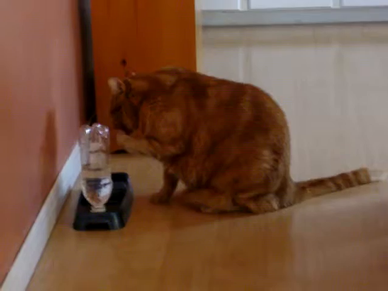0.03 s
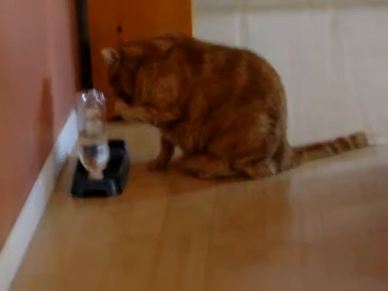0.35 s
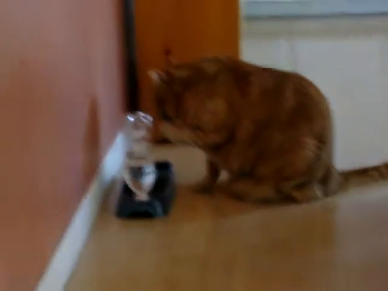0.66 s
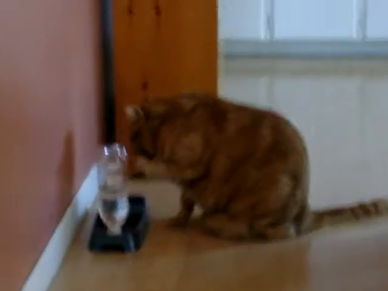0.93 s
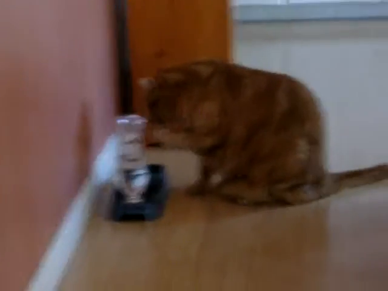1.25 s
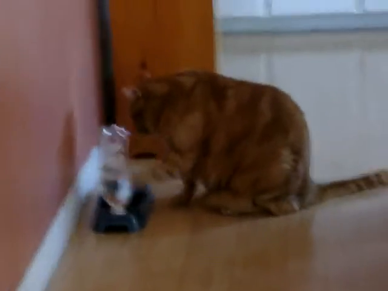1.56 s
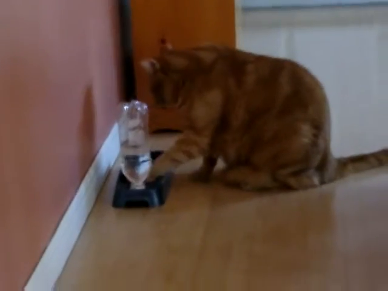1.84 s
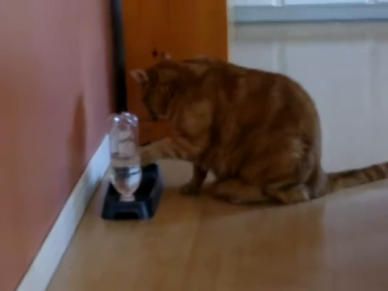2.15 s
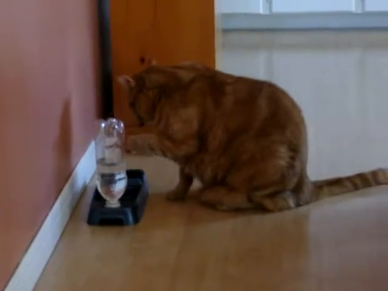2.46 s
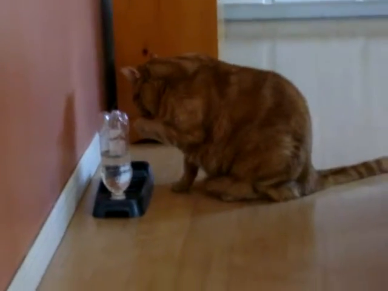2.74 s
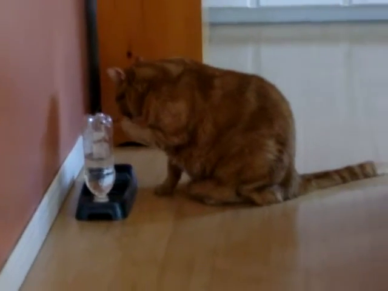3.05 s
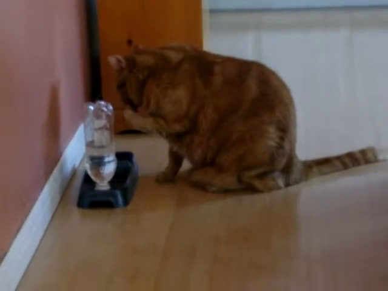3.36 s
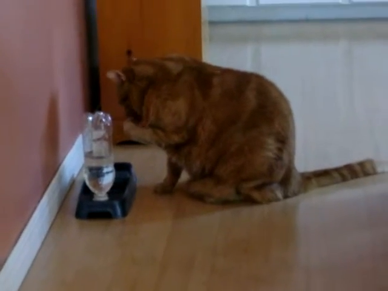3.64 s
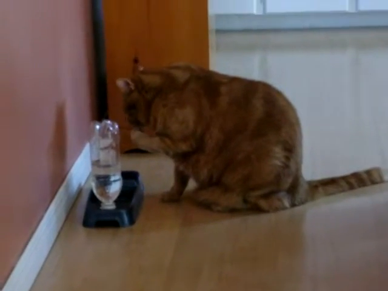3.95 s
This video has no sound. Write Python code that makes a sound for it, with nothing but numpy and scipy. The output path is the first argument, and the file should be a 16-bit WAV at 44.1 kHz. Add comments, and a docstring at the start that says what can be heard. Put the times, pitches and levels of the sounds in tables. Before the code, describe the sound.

Fingers handle a plastic camera case right at the microphone, rubbing softly at first, then knocking and thudding between 0.5 and 0.9 seconds. A small mechanism ticks sharply, loudest around 1.3 seconds, again near 2.0, 2.6 and 2.7, and more faintly at 3.3. A few soft bumps fall in between. A thin high electronic whine, low hum and hiss continue throughout in the quiet room.

```python
"""What seem to be fingers knock, bump and rub a camera's plastic case, right at the microphone.
As the grip shifts, hard taps ring the hollow shell, the soft of the hand thuds and skin slips in tiny
grains. Just as close, a small mechanism, probably in the lens, ticks now and then. The place is a quiet
room: the camera's electronics whine thinly over a low hum, room tone and microphone hiss."""
import sys
import numpy as np
from scipy import signal
from scipy.fft import rfft, irfft
from scipy.io import wavfile
from scipy.ndimage import uniform_filter1d

SR = 44100
rng = np.random.default_rng(int(sys.argv[2]) if len(sys.argv) > 2 else 0)


def unload_audio(sound):
    """Save the sound as a 16-bit wav file, at the path given as the first command line argument."""
    columns = np.transpose(np.atleast_2d(sound))
    # keep every value between -1 and 1, then stretch to whole-number steps
    steps = np.round(np.clip(columns, -1, 1) * 32767)
    wavfile.write(sys.argv[1], SR, steps.astype(np.int16))


N = 176400
T = np.arange(N) / SR


# Resonances of the plastic case (frequency [Hz], relative level [dB], t60 [s])
CASE_RESONANCES = [(786, -5.5, 0.038), (950, -6, 0.025), (1524, -13, 0.037), (1780, -7, 0.013),
                   (1984, 2.5, 0.0078), (2360, -5.5, 0.016), (2770, -8, 0.017), (2910, -4.5, 0.011),
                   (4110, 7, 0.0037), (4520, -7.5, 0.013), (4950, -13.5, 0.02), (6170, 4.5, 0.0047),
                   (7510, 5.5, 0.0046), (9800, 6.5, 0.0014)]
# Hard taps at the microphone (time [s], peak level [dB], low-pass [Hz], high-pass [Hz])
CASE_KNOCKS = [(.5025, -17, 5450, 584), (0.507, -8, 6900, 510), (0.5861, -30.5, 3400, 723),
               (0.7709, -26, 3500, 600), (0.7784, -18, 5570, 700), (.8480, -3, 4860, 1020),
               (1.6087, -23.5, 4900, 940)]
def case_knocks():
    """Fingers tap the hollow case right at the microphone, and the plastic rings briefly."""
    out = np.zeros(N)
    for start, db, bright_hz, low_hz in CASE_KNOCKS:
        add(out, start, strike(CASE_RESONANCES, db, bright_hz, low_hz, rise_s=.00017, order=3))
    return out


# Dull thuds on the case
# (time [s], level [dB], rise [s], pitch [Hz], t60 [s], overtone [Hz], relative overtone level [dB])
HAND_BUMPS = [(.6570, -12.5, 0.0028, 274, 0.029, 754, -2.5), (.8030, -9, 0.0031, 183.5, 0.098, 300, 3.5),
              (.365, -26, 0.0025, 480, 0.051, 820, -2.5), (1.493, -29, 0.0017, 325, 0.04, 482, 3),
              (1.863, -27.5, 0.0034, 440, 0.054, 523, 10), (2.336, -25, 0.0031, 467, 0.052, 330, -2)]
def hand_bumps(overtone_t60_s=.025):
    """Close up, the soft of the hand sets off a low, quickly damped ring of two partials."""
    t, out = np.arange(SR // 5) / SR, np.zeros(N)
    for start, db, rise, hz, t60, overtone_hz, overtone_db in HAND_BUMPS:
        thud = decay(t, t60) * np.sin(2 * np.pi * hz * t)
        overtone = amp(overtone_db) * decay(t, overtone_t60_s) * np.sin(2 * np.pi * overtone_hz * t)
        add(out, start, amp(db) * np.minimum(t / rise, 1) * (thud + overtone))
    return out


# Spectrum of the rubbed case (frequency [Hz], relative level [dB])
RUB_SPECTRUM = [(350, 2), (600, 2), (820, 0), (1390, -12.5), (1500, -5.5), (1750, -9), (2070, -2),
                (2370, -7), (2570, -8), (2910, -4.5), (3510, -7), (3980, -5.5), (4370, -5), (5160, -7),
                (6030, -2.5), (6630, -13), (7200, -4.5), (9360, -11.5), (15800, -120)]
# Finger strokes beside the microphone
# (time [s], rise [s], hold [s], fall [s], level [dB], tilt [dB/octave], favoured frequency [Hz])
FINGER_STROKES = [(0.022, 0.066, 0.039, 0.06, -40.5, -4, 2040),
                  (0.171, 0.096, 0.017, 0.087, -36, -2.5, 2100), (0.36, .10, 0.037, 0.057, -49, 1, 2940),
                  (0.518, 0.0077, 0.014, .015, -38.5, -2, 3500),
                  (0.607, 0.011, 0.0055, 0.012, -31, -0.5, 3130),
                  (0.619, 0.018, .06, 0.014, -37.5, -1.5, 2250),
                  (0.708, 0.0028, 0.0047, .003, -25.5, -1, 3600),
                  (.72, 0.024, .02, 0.029, -42.5, -2.5, 4720), (0.767, 0.017, 0.066, .02, -32.5, -3, 4720),
                  (0.858, .015, 0.042, 0.069, -39, 0, 4530), (0.943, 0.027, 0.18, .06, -54.5, -1, 4300),
                  (1.223, 0.0072, 0.03, 0.027, -44.5, -1, 4930),
                  (1.304, 0.0088, 0.019, 0.017, -38.5, 0.5, 5170),
                  (1.337, 0.024, 0.031, .045, -44, 0.5, 3000)]
def finger_rubs(grains_per_s=14000, grain_db=2.2, flutter_db=2.5, peak_db=6.5, peak_octaves=.3):
    """Skin slips in dense tiny grains through the case's resonances; each stroke favours one region."""
    hz, out = np.fft.rfftfreq(N, 1 / SR), np.zeros(N)
    grains = rng.standard_normal(N) * amp(grain_db * np.minimum(rng.exponential(1, N), 4))
    grains *= rng.random(N) < grains_per_s / SR
    grains *= amp(flutter_db * drift(samples=400))
    friction = cut(cut(grains, 515, "high"), 10300, "low", order=3)
    case_spectrum = rfft(friction) * amp(spectrum_db(RUB_SPECTRUM, hz))
    for start, rise, hold, fall, db, tilt_db, peak_hz in FINGER_STROKES:
        stroke = np.interp(T, start + np.cumsum([0, rise, hold, fall]), [0, 1, 1, 0])
        octaves = np.log2((hz + 1) / peak_hz)
        colour = amp(tilt_db * octaves + peak_db * np.exp(-(octaves / peak_octaves) ** 2))
        out += amp(db) * stroke * unit(irfft(case_spectrum * colour, N))
    return out


# Resonances of the small snapping part (frequency [Hz], relative level [dB], t60 [s])
MECHANISM_RESONANCES = [(1917, -17.5, 0.048), (2168, -3, 0.021), (2470, -3, 0.011), (2900, -24, 0.011),
                        (3105, 2.5, 0.006), (3690, 1, 0.011), (4540, -7, .011), (4810, 3, 0.0071),
                        (5497, 4.5, 0.0069), (5800, 0.5, 0.0076), (6340, -11.5, 0.014), (7450, -8, 0.0056)]
# Snaps close to the microphone (time [s], peak level [dB], low-pass [Hz])
MECHANISM_TICKS = [(.7112, -12.5, 6100), (1.2672, -2.5, 7550), (1.3659, -6, 7250), (2.0144, -7.5, 6380),
                   (2.5895, -8.5, 6100), (2.6972, -12, 5560), (3.3183, -16, 5100), (3.9563, -24.5, 3930)]
def mechanism_ticks():
    """The same small part, probably in the lens, snaps each time with more or less force."""
    out = np.zeros(N)
    for start, db, bright_hz in MECHANISM_TICKS:
        add(out, start, strike(MECHANISM_RESONANCES, db, bright_hz, low_hz=1700, rise_s=.00008, order=5))
    return out


def electronics_whine(hz=7703.4, band_hz=900, frame_hz=28.9, slip_turns=.72, slip_s=.0005):
    """A thin tone slips back in phase at each picture the camera takes; a weaker one holds just above."""
    frame, fraction = np.divmod((T - .0033) * frame_hz, 1)
    slip_progress = np.minimum(fraction / frame_hz / slip_s, 1)
    slips = frame + np.sin(np.pi / 2 * slip_progress) ** 2
    stumbling = amp(-44) * np.sin(2 * np.pi * (hz * T - slip_turns * slips))
    narrowed = signal.lfilter(*signal.iirpeak(hz, hz / band_hz, fs=SR), stumbling)
    steady = amp(-56) * np.sin(2 * np.pi * 7864.3 * T)
    return np.sqrt(2) * (narrowed + steady)


# Faint tones in the room (frequency [Hz], level [dB])
HUM_TONES = [(58.5, -54), (242.2, -55), (355.3, -59), (1238, -66), (1933, -65)]
# Slow dip and swell of the low drone (time [s], level [dB])
DRONE_LEVELS = [(0, -47), (.6, -46.5), (1.4, -48), (2.1, -53), (2.8, -49.5), (3.3, -44), (4, -43)]
def appliance_hum(drone_hz=113, waver_turns=.12):
    """In the background, probably a household appliance: faint wavering tones and a low drone."""
    tones = [*HUM_TONES, (drone_hz, np.interp(T, *np.transpose(DRONE_LEVELS)))]
    return np.sqrt(2) * sum(amp(db) * np.sin(2 * np.pi * (hz * T + waver_turns * drift()))
                            for hz, db in tones)


# Room tone and hiss at the microphone (frequency [Hz], relative level [dB])
ROOM_SPECTRUM = [(20, -20), (45, -6.5), (90, -5), (170, -1), (260, -2), (420, 0.5), (600, -6), (850, -5.5),
                 (1250, -15.5), (1900, -18.5), (2600, -22.5), (4500, -24.5), (7000, -25.5), (10000, -27.5),
                 (11000, -31.5), (12000, -46)]
def room_tone(level_db=-41.5, patch_db=.95):
    """Low, slightly patchy noise of the quiet room, thinning into microphone hiss."""
    hz = np.fft.rfftfreq(1024, 1 / SR)
    real, imaginary, patches = rng.standard_normal((3, N // 256 + 5, len(hz)))
    patches = uniform_filter1d(patches, size=6, axis=0)  # smooth in time
    patches = unit(uniform_filter1d(patches, size=6, axis=1))  # and in frequency
    spectra = (real + 1j * imaginary) * amp(spectrum_db(ROOM_SPECTRUM, hz) + patch_db * patches)
    _, noise = signal.istft(spectra.T, nperseg=1024, noverlap=768)
    return amp(level_db) * unit(noise[:N])


def strike(modes, db, bright_hz, low_hz, rise_s, order):
    """One blow rings the modes; a softer contact leaves out the top ones, a lighter one the lowest."""
    t = np.arange(SR // 10) / SR
    ring = sum(amp(mode_db) * decay(t, t60) * np.cos(2 * np.pi * hz * t) for hz, mode_db, t60 in modes)
    attack = 1 - np.exp(-(t + 1 / SR) / rise_s)
    blow = cut(cut(ring * attack, low_hz, "high", order), bright_hz, "low", order)
    return amp(db) * blow / abs(blow).max()


def decay(t, t60):
    """Falls by 60 dB in t60 seconds."""
    return np.exp(-np.log(1000) * t / t60)


def amp(db):
    """Decibels to gain."""
    return 10 ** (np.asarray(db) / 20)


def unit(x):
    """Scales to rms 1."""
    return x / np.sqrt(np.mean(x ** 2) + 1e-20)


def spectrum_db(points, hz):
    """Interpolates levels on a log-frequency axis."""
    point_hz, db = np.transpose(points)
    return np.interp(np.log(hz + 1), np.log(point_hz + 1), db)


def add(mix, start_s, sound):
    """Mixes a sound in at the given time."""
    part = mix[max(round(start_s * SR), 0):][:len(sound)]
    part += sound[:len(part)]


def cut(x, hz, kind, order=2):
    """Low-pass or high-pass."""
    return signal.sosfilt(signal.butter(order, min(hz, SR / 2 - 100), kind, fs=SR, output="sos"), x)


def drift(samples=9000):
    """Random wander of rms 1, smoothed over the given span."""
    return unit(uniform_filter1d(uniform_filter1d(rng.standard_normal(N), samples), samples))


def scene():
    """Close, dry handling and ticks over the whine and the quiet room, in mono."""
    close = case_knocks() + hand_bumps() + finger_rubs() + mechanism_ticks()
    background = electronics_whine() + appliance_hum() + room_tone()
    return (close + background)[None]


def record(dry):
    """The sound starts with a click after a brief silence, has a constant offset and is band-limited."""
    silence_s, offset, top_hz = .036, -.076, 11900
    sound = (dry + offset) * np.clip((T - silence_s) / .002, 0, 1)
    low_pass = signal.firwin(255, top_hz, window=("kaiser", 8), fs=SR)
    return signal.oaconvolve(sound, low_pass[None], "same")


dry = scene()
out = record(dry)
unload_audio(out)
```